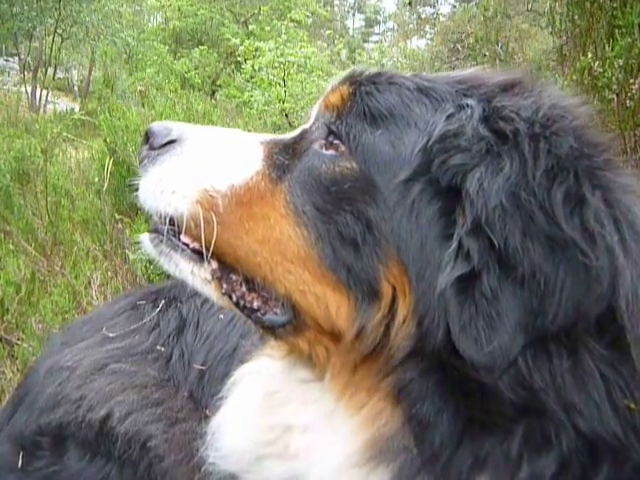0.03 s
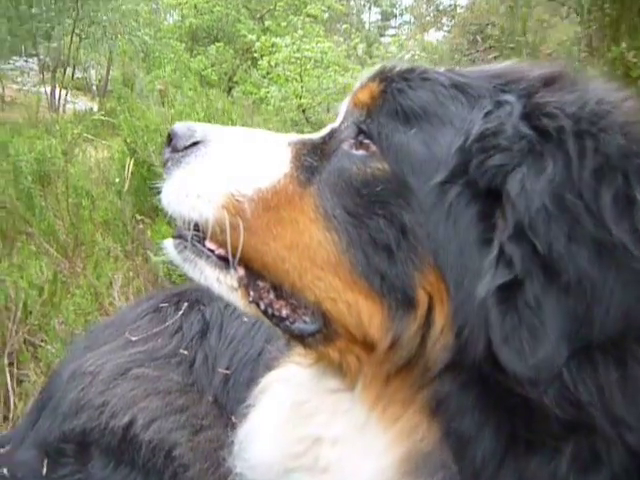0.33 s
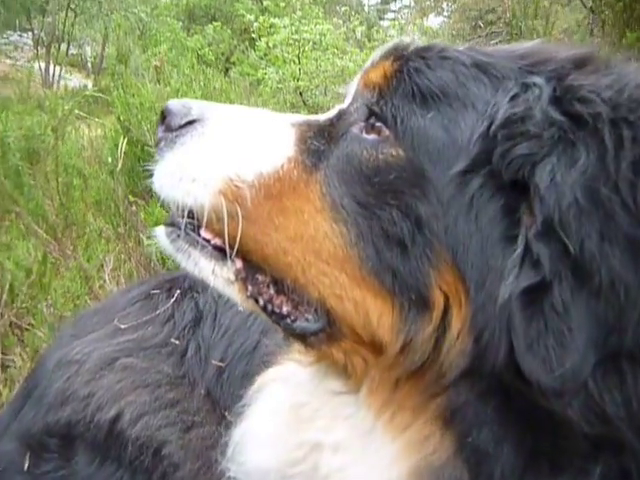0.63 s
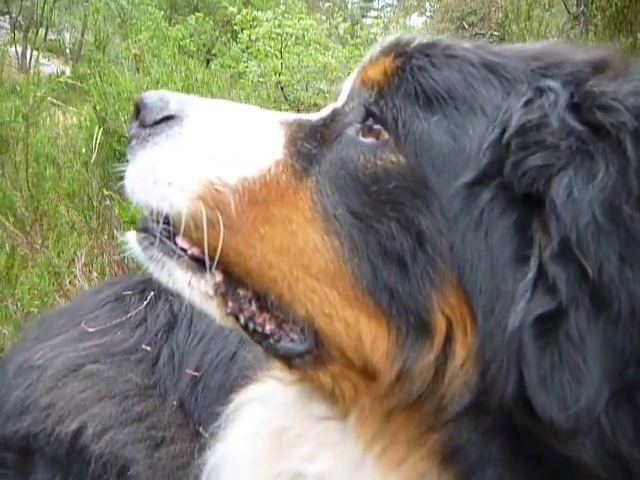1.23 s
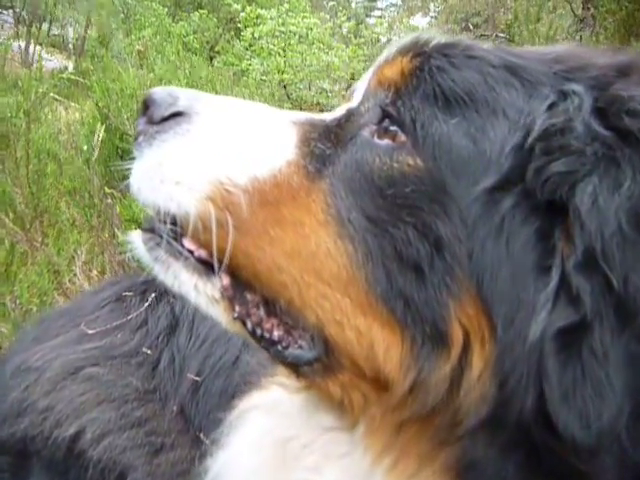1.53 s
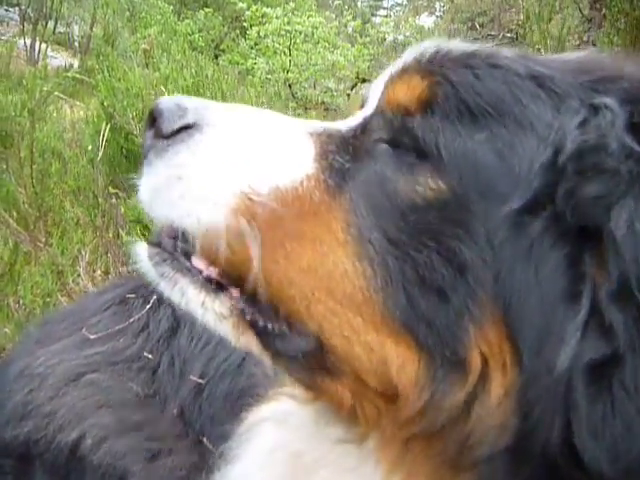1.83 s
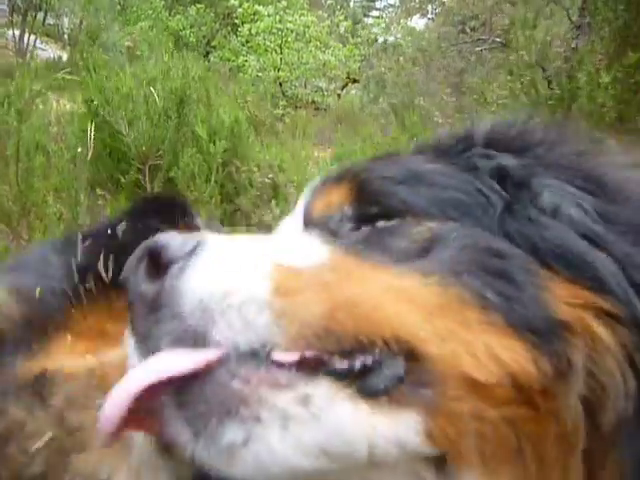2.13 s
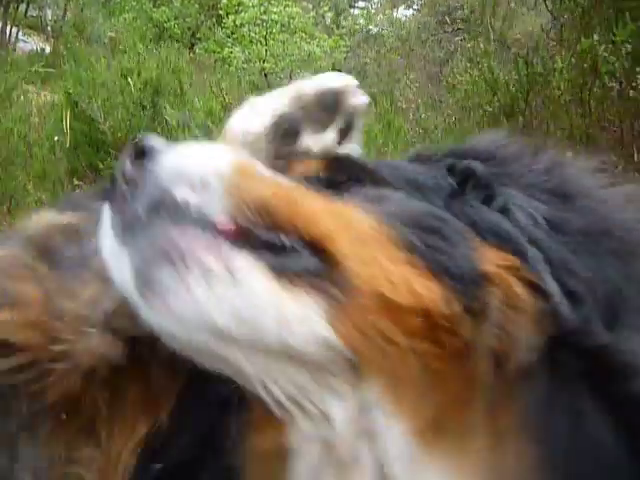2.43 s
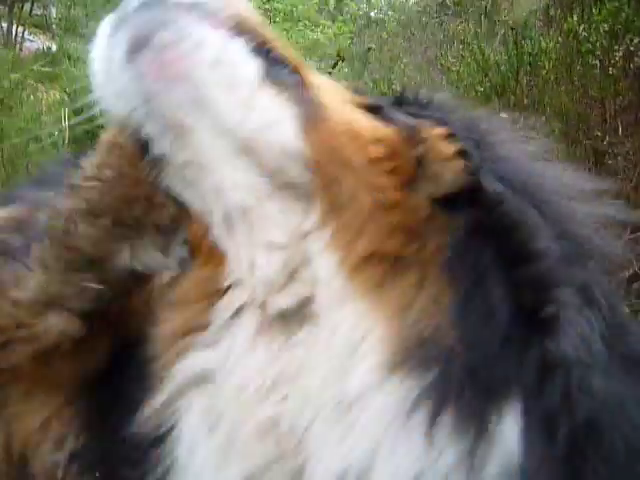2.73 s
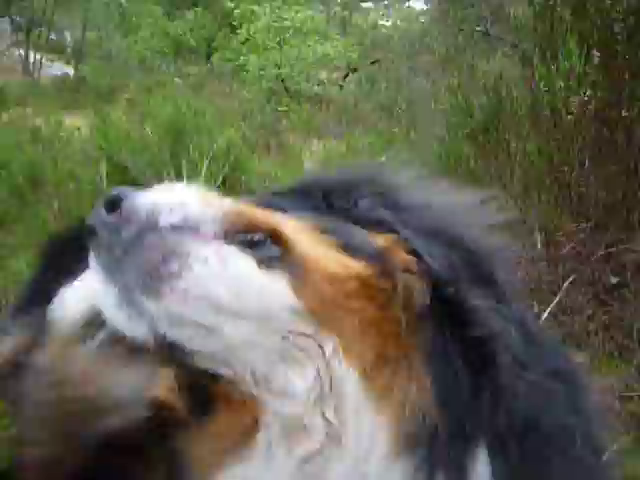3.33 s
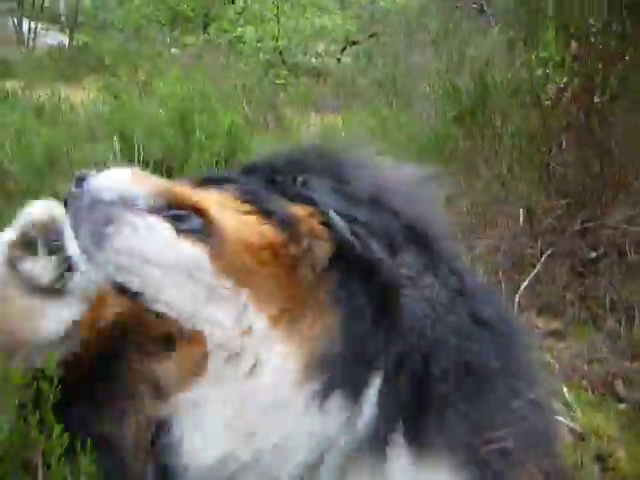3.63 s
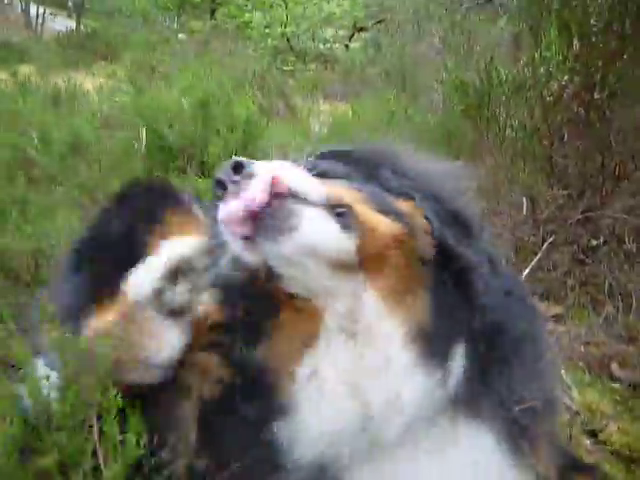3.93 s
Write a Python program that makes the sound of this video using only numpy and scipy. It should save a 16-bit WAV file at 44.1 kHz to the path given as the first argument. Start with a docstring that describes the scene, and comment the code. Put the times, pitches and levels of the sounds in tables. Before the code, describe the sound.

A dog scratches itself in quiet grassy scrub, close to the microphone. It pants faintly at first, turns with a swish of fur and grass, then scratches in soft rustling strokes with ear flaps and dry stem ticks.

```python
"""A big dog lies in grassy scrub, panting lightly over a quiet hush and a small camera's thin whine.
Near 2 s it swings round with a swish of fur and grass. Then it scratches its neck with a hind paw:
soft rustling strokes, fleshy flaps of ear and lips, and ticks of dry stems.
Near 3.4 s comes a faint clink, perhaps from the collar, and the scratching goes on to the end."""
import sys
import numpy as np
from scipy import signal
from scipy.fft import rfft, irfft
from scipy.io import wavfile

SR = 44100
rng = np.random.default_rng(int(sys.argv[2]) if len(sys.argv) > 2 else 0)


def to_wav(sig):
    """Store sig (one row per channel, or 1-D mono) as 16-bit WAV at the path in sys.argv[1].

    Samples outside -1..1 are clipped; the rate is SR.
    """
    pcm = np.clip(np.atleast_2d(sig), -1, 1) * 32767
    pcm = np.round(pcm).astype(np.int16)
    wavfile.write(sys.argv[1], SR, pcm.T)  # frames by channels


N = 176400
TIME = np.arange(N) / SR
BIN_HZ = np.arange(N // 2 + 1) * SR / N


def from_db(db):
    """Decibels to gain."""
    return 10 ** (np.asarray(db) / 20)


def rms_one(x):
    """Scale to unit level."""
    return x / np.sqrt(np.mean(x ** 2) + 1e-20)


def colour(x, curve):
    """Shape a flat sound with an EQ curve; unit level."""
    hz, db = np.transpose(curve)
    eq_db = np.interp(np.log(np.maximum(BIN_HZ, 1)), np.log(hz), db)
    return rms_one(irfft(rfft(x) * from_db(eq_db), N))


def band(x, low_hz, high_hz, order=2):
    """Band-pass."""
    sos = signal.butter(order, [low_hz, min(high_hz, .45 * SR)], "band", fs=SR, output="sos")
    return signal.sosfilt(sos, x + 1e-18)


def drift(rate_hz):
    """A random wander of unit level."""
    knots = rng.standard_normal(4000)
    return rms_one(np.interp(TIME * rate_hz, np.arange(len(knots)), knots))


def swell(centre, length):
    """A smooth rise and fall, about 9 dB down half a length from its centre."""
    return np.exp(-(2 * (TIME - centre) / length) ** 2)


def add(out, start, sound):
    """Mix a short sound in at a time in seconds."""
    i = int(start * SR)
    out[i:i + len(sound)] += sound[:max(N - i, 0)]


def grains(per_s, spread_db):
    """Tiny slips of hair and blade: random clicks, some larger than the rest if given a spread."""
    sizes = from_db(spread_db * np.minimum(rng.exponential(1, N), 4))
    return (rng.random(N) < per_s / SR) * sizes * rng.choice([-1, 1], N)


def crack(low_hz, high_hz, spray, t60):
    """A sharp click of unit height with a short dying spray of smaller ones."""
    t = TIME[:SR // 16]
    click = 1. * (t == 0)
    tail = spray * rng.standard_normal(len(t)) * from_db(-60 * t / t60)
    return band(click + tail, low_hz, high_hz) / np.abs(band(click, low_hz, high_hz)).max()


def crackle(pitches, per_s):
    """Dry blades snap at random, each ringing for a few cycles at one of many pitches; unit level."""
    snaps = grains(per_s, spread_db=2.5)
    blade = rng.integers(0, len(pitches), N)
    rings = (signal.lfilter(*signal.iirpeak(hz, Q=3.3, fs=SR), snaps * (blade == k) + 1e-18)
             for k, hz in enumerate(pitches))
    return rms_one(sum(rings))


# EQ of the outdoor bed and microphone hiss: (frequency [Hz], level [dB])
HUSH_EQ = [(30, -16.5), (60, -9), (115, -1.5), (240, -1), (550, -5), (900, -5.5), (1280, -6.5), (1700, -13),
           (3500, -19.5), (6500, -21.5), (8000, -26)]


def hush(level_db=-53, flicker_db=1.0):
    """A bed of far air and foliage, each octave wavering a little."""
    edges_hz = 25 * 2. ** np.arange(10)
    octave = np.searchsorted(edges_hz, BIN_HZ)
    spectrum = rfft(colour(rng.standard_normal(N), HUSH_EQ))
    air = sum(irfft(spectrum * (octave == k), N) * from_db(flicker_db * drift(rate_hz=15))
              for k in range(len(edges_hz) + 1))
    return from_db(level_db) * rms_one(air)


# Tones of the electronic whine: (frequency [Hz], level [dB])
WHINE_TONES = [(5425, -77), (6670, -78.5)]


def whine(width_hz=16):
    """Thin, unsteady tones from the camera's electronics."""
    out = np.zeros(N)
    for hz, db in WHINE_TONES:
        tone = band(rng.standard_normal(N), hz - width_hz / 2, hz + width_hz / 2, order=1)
        out += from_db(db) * rms_one(tone)
    return out


# Ring of snapping grass blades, here and in the swish: (pitch [Hz])
BLADE_PITCHES = np.geomspace(600, 7000, 16)


def stirring(level_db=-75):
    """Grass under the dog gives way with tiny, high ticks."""
    return from_db(level_db) * crackle(BLADE_PITCHES[8:], per_s=30)


# Light breaths: (centre time [s], length [s], level [dB])
BREATHS = [(0.242, 0.13, -58), (0.442, 0.037, -53.5), (.70, 0.15, -62), (1.19, 0.074, -57),
           (1.518, 0.08, -60), (1.741, 0.027, -54), (2.744, 0.083, -54.5), (3.552, 0.11, -54),
           (3.944, 0.23, -56)]


def panting(mouth_hz=1076, width_hz=380):
    """Air through the dog's open mouth, in one broad resonance."""
    air = rms_one(band(rng.standard_normal(N), mouth_hz - width_hz / 2, mouth_hz + width_hz / 2))
    return air * sum(from_db(db) * swell(centre, length) for centre, length, db in BREATHS)


# Hits of the clink: (time [s], level [dB])
CLINK_HITS = [(3.3842, -48.5), (3.392, -47)]
# Ring of the clink: (frequency [Hz], level [dB])
CLINK_MODES = [(3537, 0), (4188, 0), (6099, -0.67)]


def clink(t60=0.026):
    """Two light touches set a small hard object ringing."""
    out, t = np.zeros(N), TIME[:SR // 10]
    for start, db in CLINK_HITS:
        for hz, mode_db in CLINK_MODES:
            add(out, start, from_db(db + mode_db - 60 * t / t60) * np.sin(2 * np.pi * hz * t))
    return out


# Stem ticks and mouth clicks: (time [s], level [dB], pitch [Hz])
TICK_HITS = [(.3165, -44, 4800), (.3875, -38.5, 5200), (.718, -42, 1450), (0.8865, -38, 4300),
             (1.0853, -44, 5830), (1.1, -47, 910), (2.015, -35, 4600), (2.2879, -37, 4400),
             (2.3147, -41, 3560), (2.3294, -34.5, 2700), (2.3873, -43, 4000), (2.5203, -36.5, 6100),
             (2.9306, -40, 3600), (3.0537, -38, 2900), (3.1664, -36, 4780), (3.2985, -45, 2800)]


def ticks(edge_ratio=1.44, t60_cycles=19):
    """A dry stem or the mouth gives a tiny crack that rings briefly at a pitch of its own."""
    out, t = np.zeros(N), TIME[:SR // 16]
    for start, db, hz in TICK_HITS:
        snap = crack(hz / edge_ratio, hz * edge_ratio, spray=0.19, t60=0.01)
        ring = 0.52 * np.sin(2 * np.pi * hz * t) * from_db(-60 * t * hz / t60_cycles)
        add(out, start, from_db(db) * (snap + ring))
    return out


# Fader moves of the swish: (time [s], body level [dB], treble level [dB])
SWISH_FADERS = [(1.81, -75, -63.5), (1.85, -47, -50), (1.865, -40.5, -45.5), (1.892, -37, -40),
                (1.962, -38.5, -39), (1.988, -40, -41), (2.018, -38, -36), (2.035, -42, -42.5),
                (2.07, -47, -46), (2.108, -40.5, -49.5), (2.16, -68, -62.5), (2.2, -70, -84)]
# EQ of its body: (frequency [Hz], level [dB])
BODY_EQ = [(80, -21), (190, -7.5), (290, -1.5), (600, 0.5), (800, 1.5), (1060, 1.5), (1400, -5.5),
           (2200, -16.5), (5000, -47)]
# EQ of its fine slips: (frequency [Hz], level [dB])
SLIP_EQ = [(700, -28), (1550, 0.5), (4000, -0.5), (6100, -1), (7300, -10.5), (8300, -15.5)]


def swish(clump_db=0.83, blades_db=-10):
    """The coat sweeps through grass: coarse slips for body, fine ones and snapping blades for treble."""
    times, body_db, treble_db = np.transpose(SWISH_FADERS)
    clumps = from_db(clump_db * drift(rate_hz=300))
    body = colour(clumps * grains(per_s=1500, spread_db=0), BODY_EQ)
    slips = colour(clumps * grains(per_s=7000, spread_db=2), SLIP_EQ)
    treble = rms_one(slips + from_db(blades_db) * crackle(BLADE_PITCHES, per_s=640))
    return sum(layer * from_db(np.interp(TIME, times, db, left=-np.inf, right=-np.inf))
               for layer, db in [(body, body_db), (treble, treble_db)])


# Flaps of ear, lips and paw:
# (time [s], thud level [dB], thud pitch [Hz], thud t60 [s], slap level [dB], slap top edge [Hz])
FLAP_HITS = [(2.0956, -26.5, 476, 0.0071, -32, 4500), (2.1094, -15, 557, 0.0042, -26, 3400),
             (2.2653, -34, 600, 0.018, -39, 4000), (2.794, -36, 330, 0.016, -31.5, 7500),
             (2.8259, -31, 590, 0.0032, -27, 5500), (2.8285, -19.5, 420, 0.0081, -19.5, 5100),
             (2.8355, -20, 443, 0.0048, -26.5, 6460), (2.8455, -23, 377, .02, -29, 6960),
             (2.8992, -33, 452, 0.0078, -36, 3800), (3.2085, -26.5, 374, 0.0056, -35.5, 3800),
             (3.23, -28, 336, 0.014, -36, 3400), (3.248, -24, 312, 0.012, -43, 3600),
             (3.3872, -27, 394, 0.038, -40, 4000), (3.978, -32.5, 580, 0.0093, -26.5, 4530)]


def flaps(bend=0.92, bend_s=0.00062, attack_s=0.00014):
    """Soft parts meet: a slap, crisp or dull, over a short thud that sinks in pitch."""
    out, t = np.zeros(N), TIME[:SR // 16]
    for start, thud_db, hz, t60, slap_db, slap_top_hz in FLAP_HITS:
        cycles = hz * (t + bend * bend_s * (1 - np.exp(-t / bend_s)))  # sinks from (1 + bend) * hz to hz
        envelope = (1 - np.exp(-t / attack_s)) * from_db(-60 * t / t60)
        thud = band(np.cos(2 * np.pi * cycles) * envelope, low_hz=160, high_hz=1890)
        slap = crack(low_hz=1100, high_hz=slap_top_hz, spray=0.17, t60=0.0058)
        add(out, start, -from_db(thud_db) * thud - from_db(slap_db) * slap)
    return out


# Paw strokes through fur: (centre time [s], length [s], rustle level [dB], rub level [dB])
PAW_STROKES = [(.36, .12, -63.5, -83), (0.727, 0.24, -65, -63), (2.188, 0.18, -56, -52.5),
               (2.335, 0.16, -50.5, -56.5), (2.514, 0.081, -57.5, -59.5), (2.673, 0.25, -54.5, -58.5),
               (2.837, 0.051, -41.5, -43.5), (2.897, 0.021, -48.5, -50), (2.966, 0.084, -56.5, -54),
               (3.098, 0.099, -54.5, -57.5), (3.224, 0.065, -55, -59), (3.31, 0.085, -56.5, -56.5),
               (3.495, 0.31, -59, -53), (3.634, 0.026, -53, -54), (3.739, 0.075, -63, -51.5),
               (3.884, 0.087, -52.5, -50.5)]
# EQ of the fur rustle: (frequency [Hz], level [dB])
RUSTLE_EQ = [(400, -11), (900, 6), (2400, 2.5), (4000, -1.5), (6000, -2), (8300, -12.5)]
# EQ of the skin rub: (frequency [Hz], level [dB])
RUB_EQ = [(50, -24), (120, -0.5), (220, -1), (480, 3), (800, -11), (1400, -11.5), (3000, -46)]


def scratching():
    """Each stroke combs a fine crackle out of the fur over a dull rub on the skin."""
    rustle = colour(grains(per_s=4500, spread_db=4), RUSTLE_EQ)
    rub = colour(grains(per_s=1500, spread_db=2.5), RUB_EQ)
    return sum(swell(centre, length) * (from_db(rustle_db) * rustle + from_db(rub_db) * rub)
               for centre, length, rustle_db, rub_db in PAW_STROKES)


def scene():
    """A mono mix, close and dry in the open air."""
    bed = hush() + stirring()
    dog = panting() + swish() + scratching() + flaps() + ticks() + clink()
    return (bed + dog + whine())[None]


def record(dry, roll_off_hz=7790, cutoff_hz=8750, dc_offset=-0.0491):
    """A small camera rolls off the treble, cuts the top octave and adds a constant offset."""
    dull = signal.sosfilt(signal.cheby1(7, .5, roll_off_hz, fs=SR, output="sos"), dry)
    return signal.sosfilt(signal.cheby1(12, .2, cutoff_hz, fs=SR, output="sos"), dull) + dc_offset


dry = scene()
out = record(dry)
to_wav(out)
```